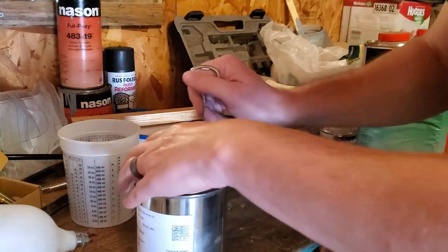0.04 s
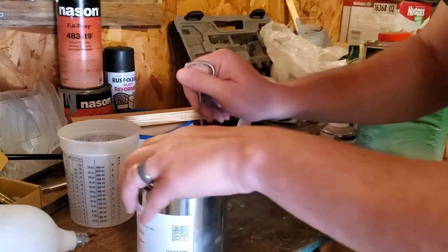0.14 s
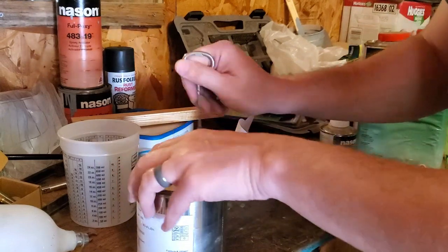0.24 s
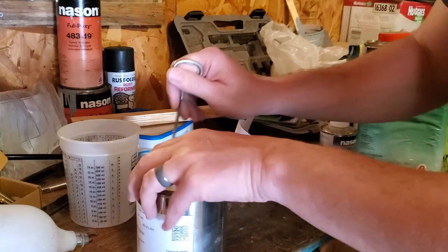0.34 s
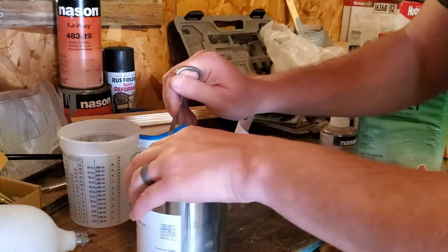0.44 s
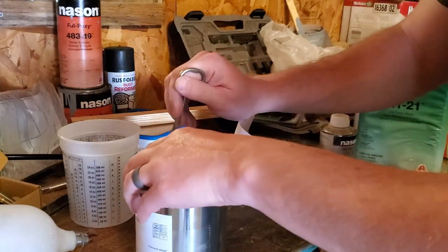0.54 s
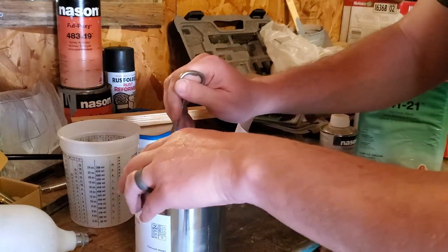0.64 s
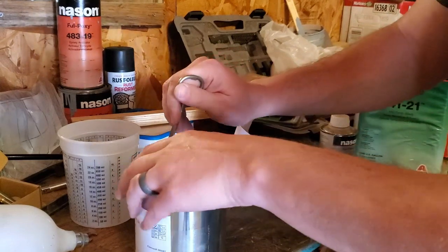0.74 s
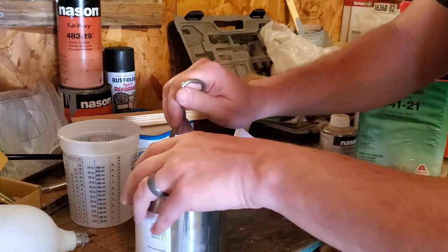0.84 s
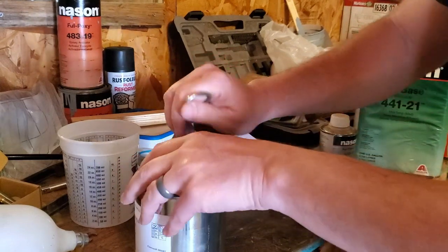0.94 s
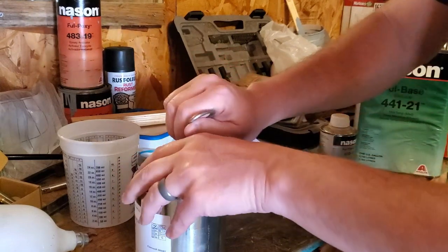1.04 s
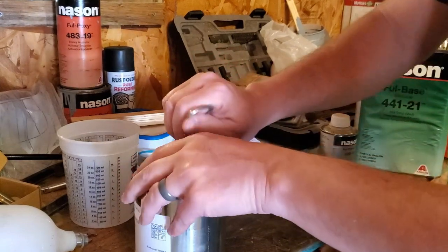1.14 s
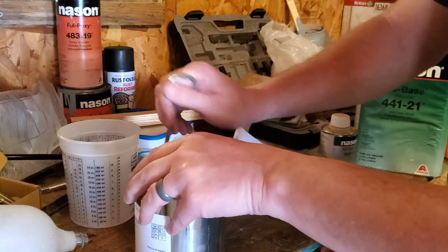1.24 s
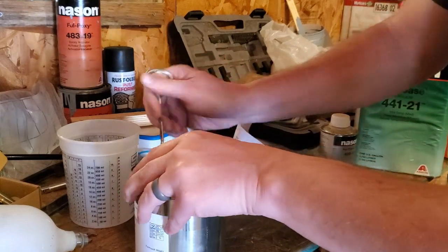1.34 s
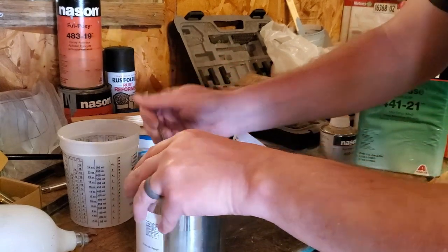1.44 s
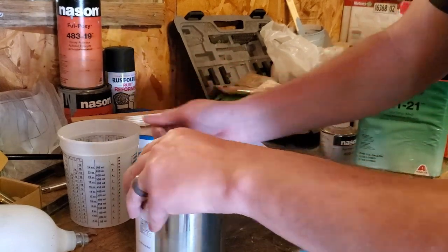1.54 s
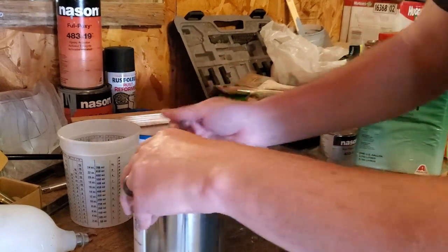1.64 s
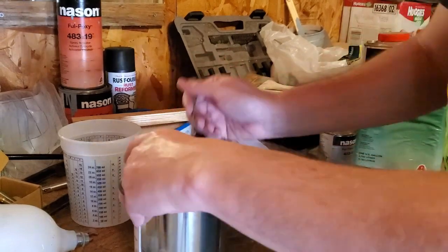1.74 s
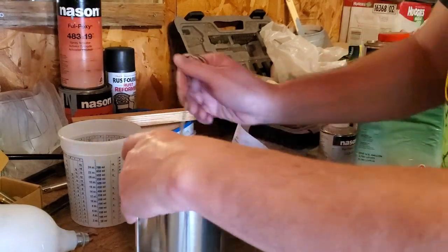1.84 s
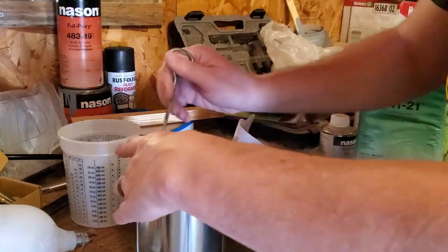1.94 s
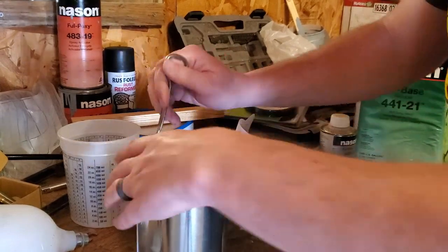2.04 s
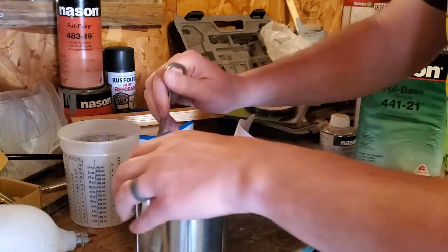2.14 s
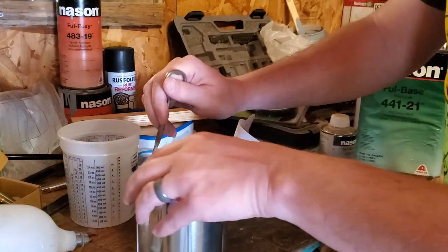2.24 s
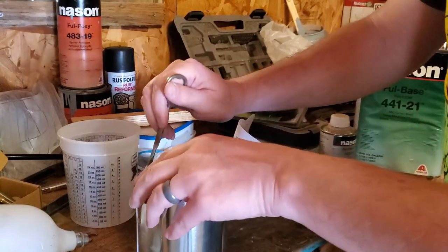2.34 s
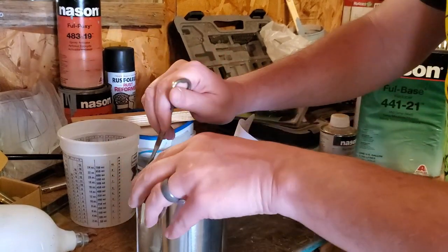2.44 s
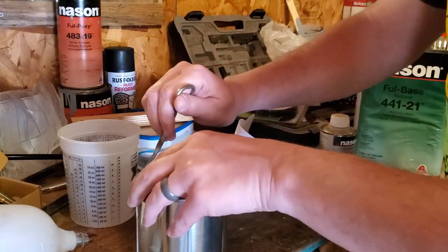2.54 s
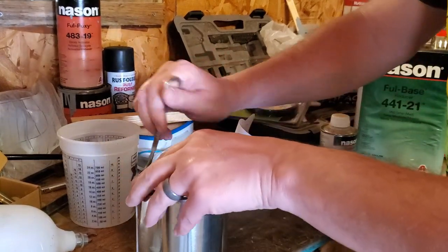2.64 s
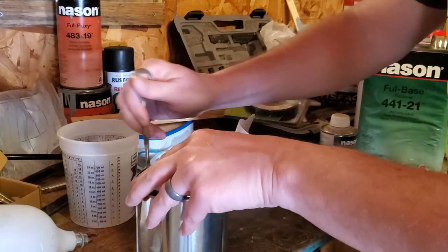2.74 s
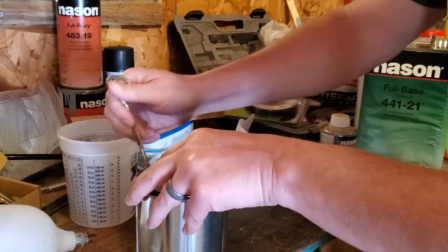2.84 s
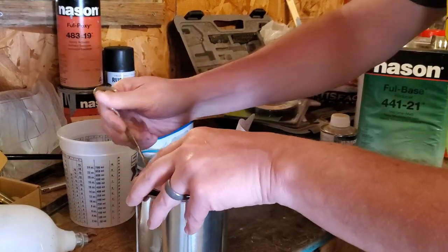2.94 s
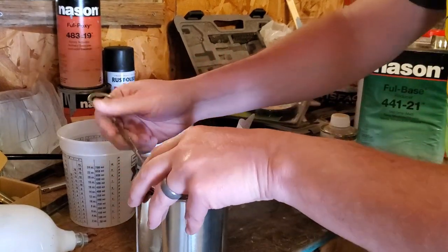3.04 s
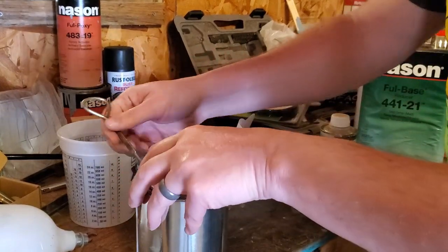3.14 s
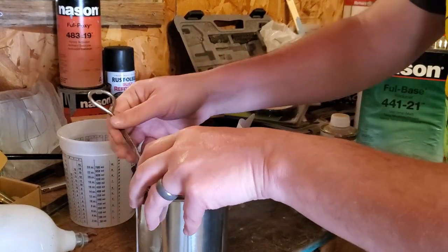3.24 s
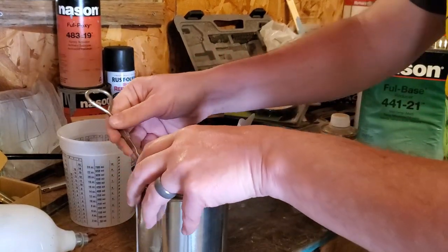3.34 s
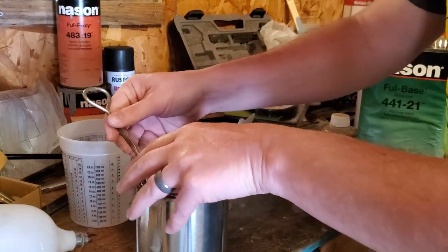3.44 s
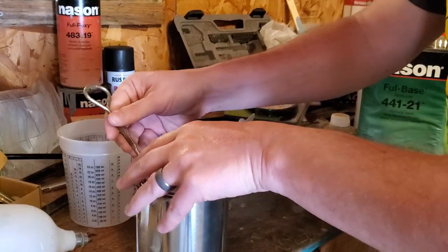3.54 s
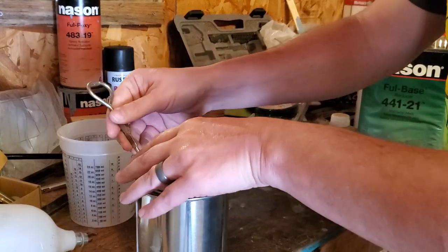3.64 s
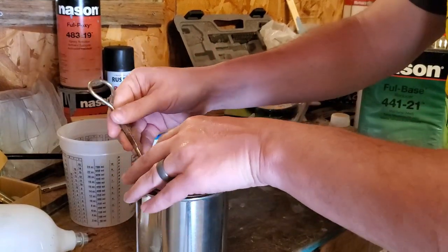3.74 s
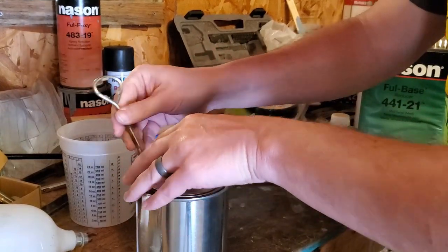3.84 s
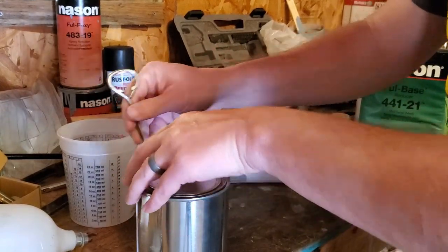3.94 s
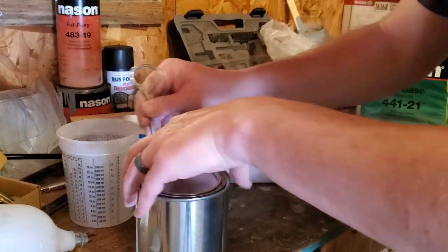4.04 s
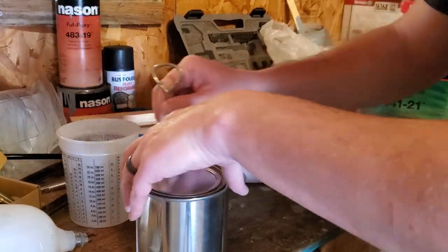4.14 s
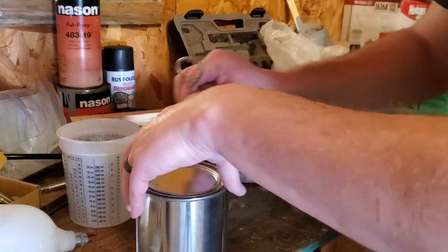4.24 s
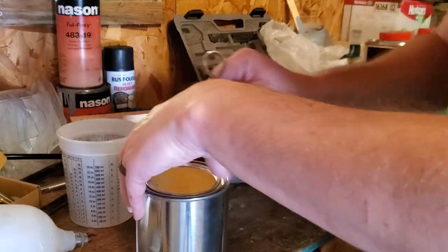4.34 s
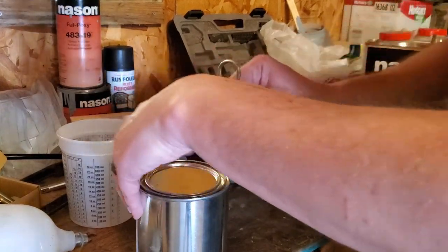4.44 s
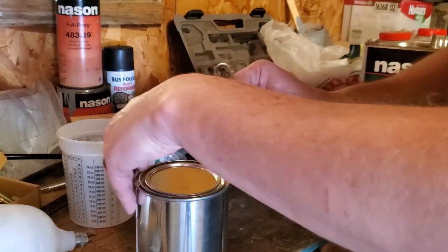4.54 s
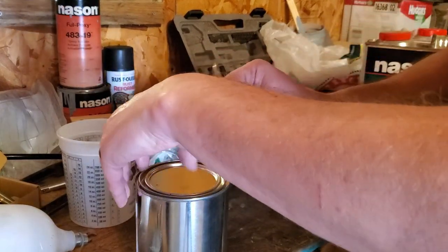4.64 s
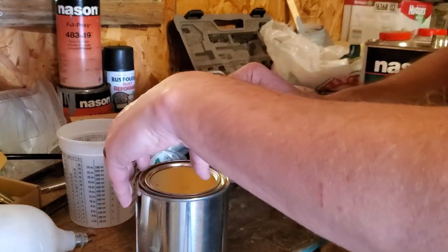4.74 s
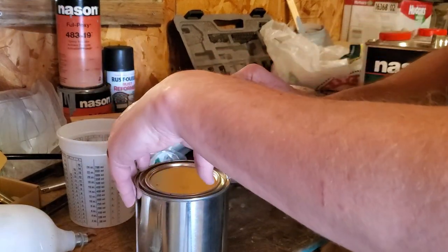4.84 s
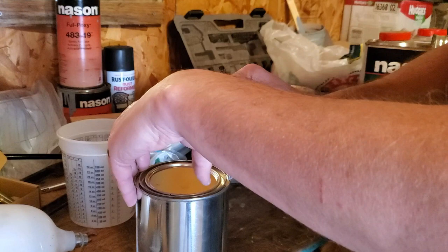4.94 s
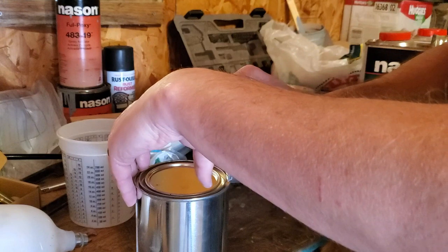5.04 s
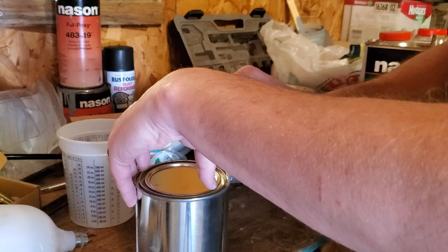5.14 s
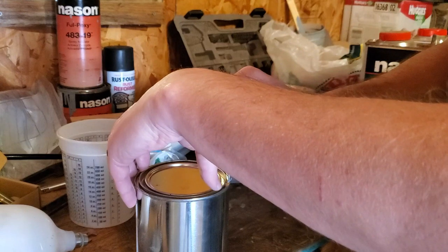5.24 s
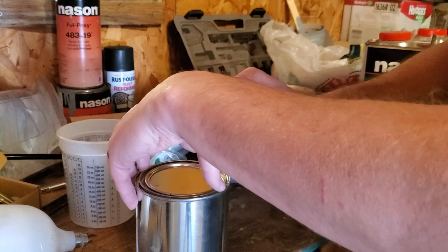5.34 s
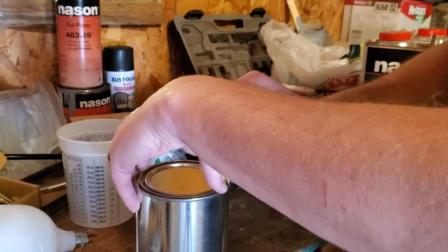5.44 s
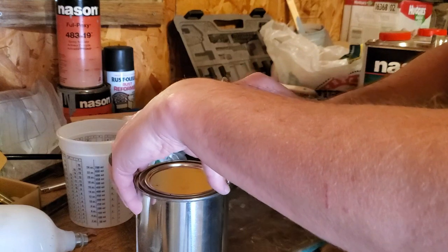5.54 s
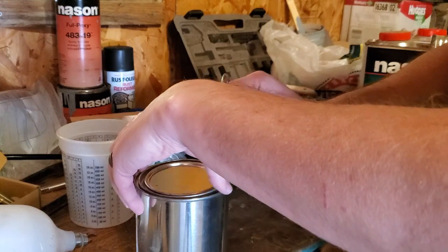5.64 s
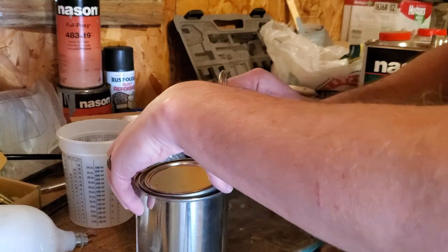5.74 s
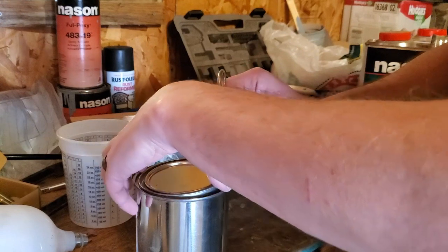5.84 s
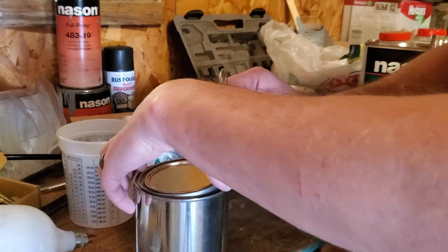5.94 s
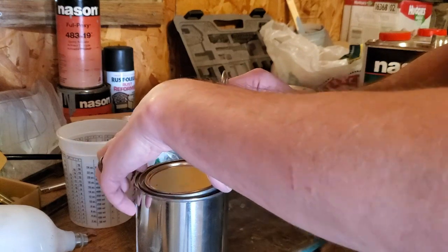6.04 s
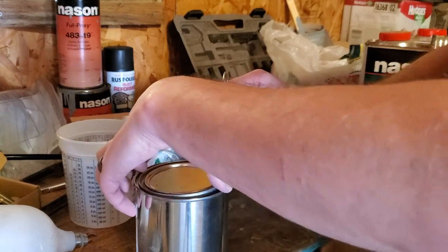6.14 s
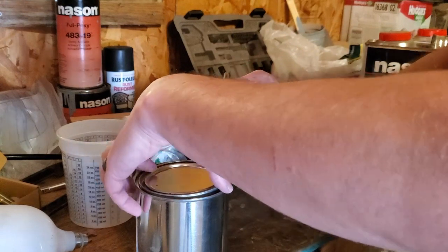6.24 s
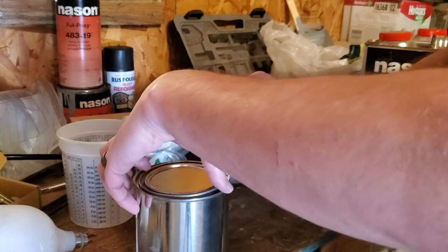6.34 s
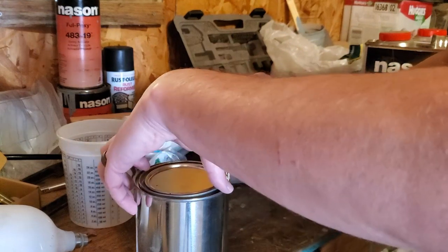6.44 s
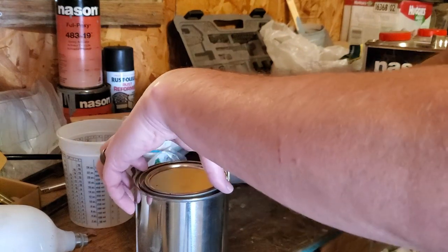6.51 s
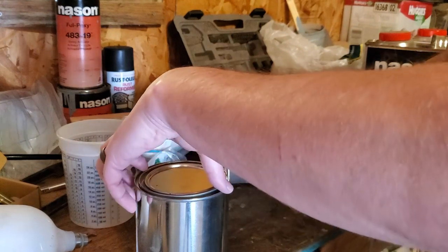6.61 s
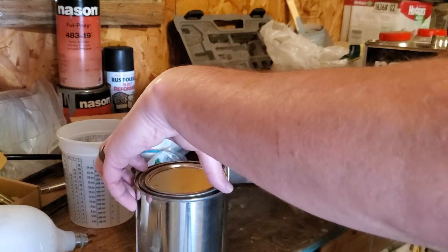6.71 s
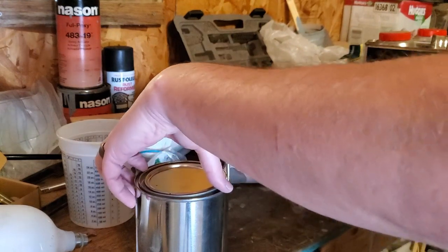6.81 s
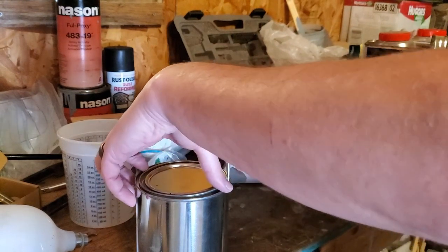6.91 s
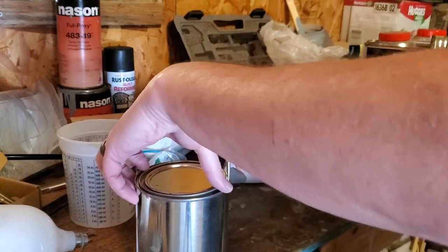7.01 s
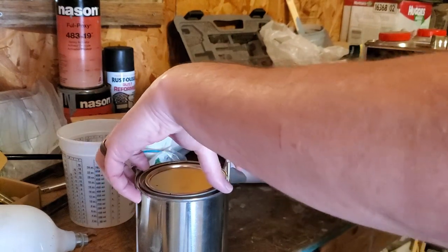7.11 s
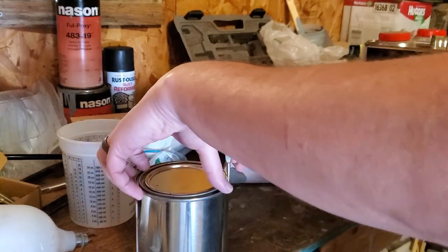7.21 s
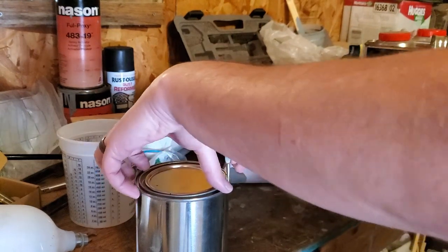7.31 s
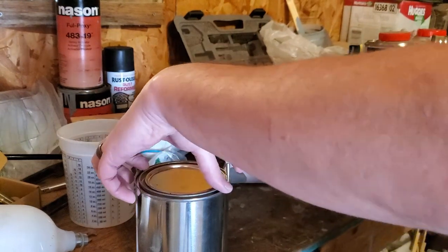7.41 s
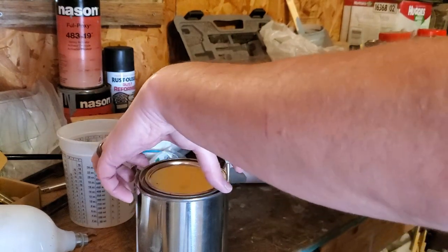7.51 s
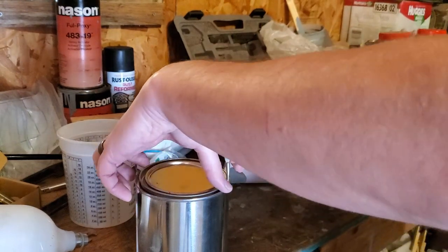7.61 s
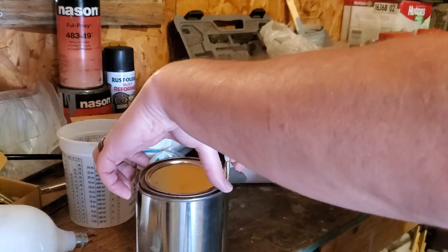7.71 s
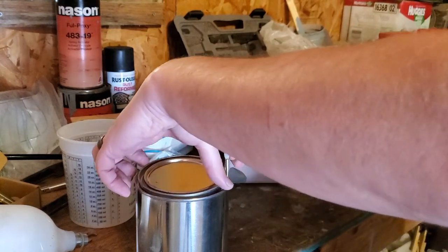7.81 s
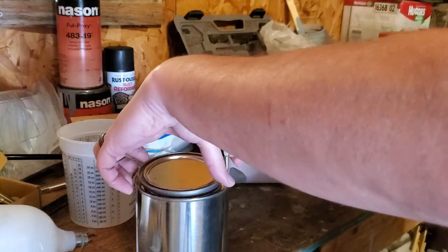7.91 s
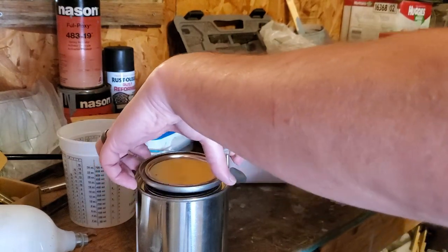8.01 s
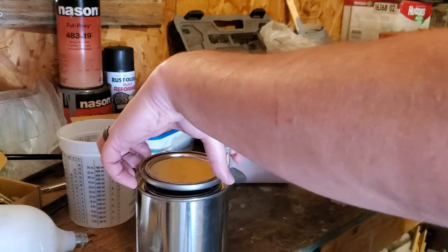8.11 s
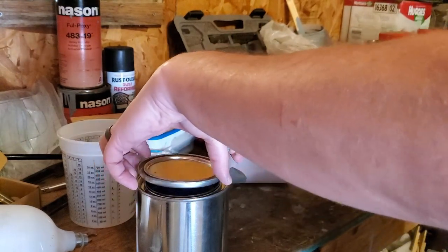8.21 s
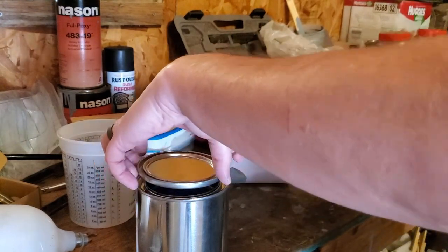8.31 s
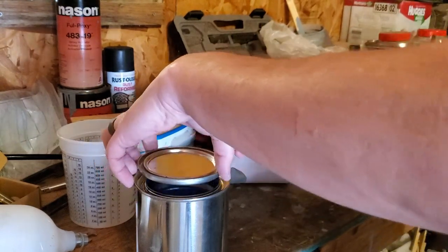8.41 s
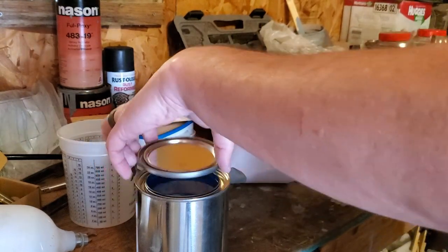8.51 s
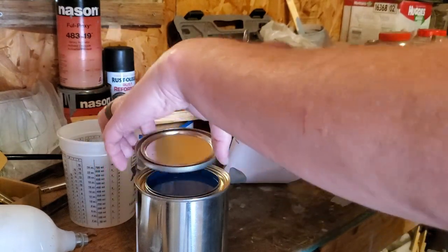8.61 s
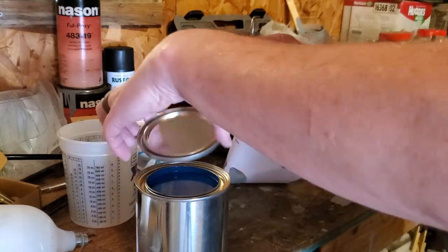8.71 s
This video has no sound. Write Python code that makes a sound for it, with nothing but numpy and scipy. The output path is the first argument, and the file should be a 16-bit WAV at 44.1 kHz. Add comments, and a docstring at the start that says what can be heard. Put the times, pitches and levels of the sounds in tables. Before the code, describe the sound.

A close stereo pickup in a small workshop with short dull echoes and a brief diffuse tail. A steel opener pries round the lid of a full metal can on a wooden bench. Quiet taps open, with firmer knocks at 0.25 and 0.9 s, then the loudest bright double clack at about 1.17 s. Soft scrapes and small hollow clicks run from 1.4 to 2 s, with another hard, crisp clack at 2.7 s. Light ticks follow, a short gritty slip at 3.2 s, then bright tinny scraping bunched around 4.1 to 4.25 s. After a pause, medium knocks come at 5.1, 5.5 and 5.74 s. From 6.2 s there are sparse muted bumps, low rubs and thin rim ticks, fading to tiny slips by 8.6 s. Beneath lie soft bench thuds, wavering low drone, rumble, hiss and very faint hum.

```python
"""In a small workshop, a steel opener works round the lid of a full paint can on a wooden bench.
Tool clicks and can knocks are short bursts of steel chatter beside the ringing modes of can, lid and opener;
scrapes are dense runs of tiny slips into the same can, and slips of the rim give faint high ticks.
Jolts set the bench top swaying. Under it lie a wavering low drone, rumble, microphone hiss and two thin tones
of hum. The chatter of the knocks, the tin noise of the slides and the ticks carry the workshop's echoes and
diffuse tail; in a knock or slide the can's modes ring beside them without the room."""
import sys
import numpy as np
from scipy import signal
from scipy.fft import rfft, irfft, next_fast_len
from scipy.io import wavfile

SR = 44100
rng = np.random.default_rng(int(sys.argv[2]) if len(sys.argv) > 2 else 0)


def dump(signal):
    """Clip the signal to [-1, 1] and save it as 16-bit WAV at the path in sys.argv[1]."""
    limited = np.clip(np.atleast_2d(signal).T, -1, 1)
    pcm = np.round(limited * 32767).astype(np.int16)
    wavfile.write(sys.argv[1], SR, pcm)


N = 386757
SIZE = 32768  # samples in one contact with its decay
TIME, FREQ = np.arange(SIZE) / SR, np.maximum(np.fft.rfftfreq(SIZE, 1 / SR), 1)

# register centres, from bench thud through can body, lid and rim click to top tick: (frequency [Hz])
REGISTER_HZ = [190, 490, 1200, 3900, 11000]
# modes of can, lid and opener: (frequency [Hz], relative level [dB], t60 [s])
CAN_MODES = [(147.3, -3, 0.38), (184.2, -7.5, 0.25), (287.5, -4, 0.23), (397, 3, 0.2), (430.5, 2.5, 0.16),
             (495, 3.5, 0.099), (538.6, -1.5, 0.3), (578.6, -2, 0.2), (646, -5.5, .25), (694, -5, 0.27),
             (844, -3, 0.36), (980, -2, 0.11), (1085, -10, 0.11), (1178, -4.5, 0.2), (1450, -18, 0.087),
             (1572, -0.5, 0.18), (1744, -5.5, 0.24), (2265, -3.5, 0.17), (3040, -9.5, 0.2),
             (3260, -13, 0.21), (3800, -15, 0.22), (3870, -10, 0.15), (4040, -7.5, 0.22),
             (4970, -5.5, 0.14), (6330, 2.5, 0.035), (12360, -3.5, 0.076)]
# colour of the dense, unresolved ringing of the tin: (frequency [Hz], relative level [dB])
TIN_COLOUR = [(50, -8.5), (130, -8), (310, -1), (345, -6.5), (380, 0), (570, -2), (720, -3), (950, -5.5),
              (1550, -5), (1950, -11.5), (3400, -8.5), (3900, -8.5), (7000, -8.5), (16000, -13)]


def from_db(db):
    """Decibels to gain."""
    return 10 ** (np.asarray(db) / 20)


def unit(x):
    """Scale to a mean energy of 1 per channel."""
    return x / np.sqrt(np.mean(np.sum(x ** 2, axis=-1)) + 1e-30)


def at_hz(points, hz):
    """Read a table on a log-frequency axis."""
    f, value = np.transpose(points)
    return np.interp(np.log(hz), np.log(f), value)


def colour(x, db):
    """Causal (minimum-phase) filter with the given gain on FREQ."""
    cepstrum = irfft(np.log(from_db(db)))
    # folding the cepstrum onto positive time makes the phase minimal
    cepstrum[1:SIZE // 2] *= 2
    cepstrum[SIZE // 2 + 1:] = 0
    return irfft(rfft(x, SIZE) * np.exp(rfft(cepstrum)))


def convolve(a, b):
    """Pass a through the response b."""
    return irfft(rfft(a, 2 * SIZE) * rfft(b, 2 * SIZE))[..., :SIZE]


def fade(t60):
    """Free decay by 60 dB in t60 seconds."""
    return np.exp(-np.log(1000) * TIME / max(t60, 1e-3))


def add(out, s, x):
    """Mix a sound in at time s."""
    i = max(round(s * SR), 0)
    out[:, i:i + SIZE] += x[:, :N - i]


def stereo_spread(mid, side, alike):
    """Two equally strong channels whose likeness runs from -1 (opposite) to 1 (the same)."""
    return np.sqrt(1 + alike) * mid + np.sqrt(1 - alike) * side * [[1], [-1]]


def unsteady(points=60):
    """Slow random drift: normal draws joined by straight lines over the whole scene."""
    t = np.arange(N) / SR
    return np.interp(t, np.linspace(0, t[-1], points), rng.standard_normal(points))


def steady_noise(spectrum, low_hz, high_hz):
    """Stereo noise of a given colour between two soft edges; rms 1."""
    # how alike left and right are: (frequency [Hz], likeness [-1 to 1])
    likeness = [(40, 1), (200, 0.66), (600, 0.1), (1500, 0.041), (16000, 0.03)]
    length = next_fast_len(N)
    hz = np.maximum(np.fft.rfftfreq(length, 1 / SR), 1)
    mid, side = rfft(rng.standard_normal((2, length)))
    alike = np.clip(at_hz(likeness, hz), -1, 1)
    edges = np.sqrt((1 + (low_hz / hz) ** 8) * (1 + (hz / high_hz) ** 8))
    gain = from_db(at_hz(spectrum, hz)) / edges
    noise = irfft(gain * stereo_spread(mid, side, alike), length)[:, :N]
    return np.sqrt(N) * unit(noise)


def background(drone_hz, drone_db, wander_hz, flutter_db, rumble_db, rumble_follows):
    """A wavering low drone, rumble that partly follows its level, microphone hiss and steady low room noise."""
    # swell of the drone: (time [s], relative level [dB])
    drone_swell = [(0.0, -48.5), (2.15, -53.5), (2.27, -61), (4.67, -63), (4.69, -70), (5.67, -54.5),
                   (5.76, -71.5), (5.91, -53.5), (6.13, -71.5), (6.32, -59.5), (6.94, -60.5), (7.01, -72),
                   (7.5, -52), (7.84, -70.5), (8.65, -54), (8.77, -72)]
    # colour of the rumble and room noise: (frequency [Hz], relative level [dB])
    rumble_colour = [(15, -34), (25, -8.5), (48, 5), (70, 4.5), (89, -7.5), (118, -16), (162, -16.5),
                     (204, -24.5), (292, -19), (400, -35), (520, -61), (880, -120)]
    # colour of the hiss: (frequency [Hz], relative level [dB])
    hiss_colour = [(200, -3), (350, -0.5), (700, -3.5), (1200, -11), (2500, -14), (5600, -15.5),
                   (6200, -9.5), (6700, -2), (7400, -12.5), (8800, -6.5), (10200, -15.5), (13000, -16),
                   (16000, -19)]
    wander, flutter = unsteady(), unsteady()
    swell_db = np.interp(np.arange(N) / SR, *np.transpose(drone_swell))

    drone = np.sqrt(2) * np.sin(2 * np.pi * np.cumsum(drone_hz + wander_hz * wander) / SR)
    drone = from_db(drone_db + swell_db + flutter_db * flutter) * drone
    rumble_level_db = rumble_db + rumble_follows * (swell_db - swell_db.mean())
    rumble = from_db(rumble_level_db) * steady_noise(rumble_colour, low_hz=43.8, high_hz=127.5)
    hiss = from_db(-75) * steady_noise(hiss_colour, low_hz=197, high_hz=17250)
    room_noise = from_db(-68.5) * steady_noise(rumble_colour, low_hz=107.7, high_hz=297.3)
    return drone + rumble + hiss + room_noise


def hum():
    """Faint distant hum: two thin sines share a slight pitch waver; they sink a little, then grow at the end."""
    # tones: (frequency [Hz], level before the swell [dB])
    hum_tones = [(612, -83), (772, -82.5)]
    # swell: (time [s], level [dB])
    hum_swell = [(0, -9.5), (7.5, -13), (8.1, -8.5), (8.77, -2)]
    waver = 1 + .005 * unsteady()
    tones = 0
    for hz, db in hum_tones:
        tones = tones + from_db(db) * np.sqrt(2) * np.sin(2 * np.pi * hz * np.cumsum(waver) / SR)
    return tones * from_db(np.interp(np.arange(N) / SR, *np.transpose(hum_swell)))


def workshop(tail_db, build_s, echo_cut_hz, lead_s):
    """Stereo response: direct sound, a few dull echoes, and a diffuse tail most alike in both ears in the bass."""
    # echoes off bench clutter, wall and roof: (delay [s], level before dulling [dB])
    echo_list = [(.0052, -8), (0.0098, 3.5), (0.025, -11.5), (0.0424, -1.5)]
    # decay of the diffuse tail: (band centre [Hz], t60 [s])
    tail_decay = [(150, 0.45), (400, 0.43), (1040, 0.36), (2760, 0.29), (7280, 0.27), (14000, .23)]
    # the direct sound reaches the left ear first
    direct = np.exp(2j * np.pi * FREQ * np.array([[0], [-round(lead_s * SR) / SR]]))
    echoes = 0
    for delay, db in echo_list:
        ear_delays = delay + rng.normal(0, 0.00012, (2, 1))
        echoes = echoes + from_db(db) * np.exp(-2j * np.pi * FREQ * ear_delays)
    dull_echoes = echoes / (1 + 1j * FREQ / echo_cut_hz)

    mid, side = rfft(rng.standard_normal((2, SIZE)))
    diffuse = stereo_spread(mid, side, np.clip(.95 * np.sinc(FREQ / 950), -1, 1))
    centres = np.log([hz for hz, t60 in tail_decay])
    tail = 0
    for share, (hz, t60) in zip(np.eye(len(centres)), tail_decay):
        band = np.interp(np.log(FREQ), centres, share)
        tail = tail + irfft(diffuse * band) * fade(t60)
    tail = unit(tail * (1 - np.exp(-TIME / build_s)))
    return irfft(direct + dull_echoes) + from_db(tail_db) * tail


def ringing(modes, spread_db):
    """Each touch wakes the modes with new strengths; the higher ones reach the two ears out of step."""
    out = np.zeros((2, SIZE))
    draws = rng.standard_normal((len(modes), 3))
    for (hz, db, t60), (size, start, skew) in zip(modes, draws):
        wave = np.exp(2j * np.pi * hz * TIME) * fade(t60)
        phase = np.pi * start + np.array([[0], [skew * min(hz / 520, 2)]])
        # dividing by the root of t60 keeps long modes from gaining energy
        gain = from_db(db + spread_db * size) / np.sqrt(max(t60, 1e-3))
        out += gain * (wave * np.exp(1j * phase)).real
    return unit(out * (1 - np.exp(-TIME / 0.00073)))  # soft onset


def contact(strength_db, brightness, hollow_db):
    """Register levels: brightness tilts to the treble, positive hollowness keeps to the lid's middle range."""
    # register levels in an ordinary contact: (relative level [dB])
    ordinary_contact = [-7, -0.73, -0.07, -3, -17]
    lid_hz, hollow_octaves = 1200, 3
    octaves = np.log2(np.array(REGISTER_HZ) / lid_hz)
    hollow = hollow_db * (octaves / hollow_octaves) ** 2
    return strength_db + np.array(ordinary_contact) + brightness * octaves - hollow


def voiced(x, levels_db):
    """Place and hardness of a contact set how much goes into each register (rms over 50 ms)."""
    # treble response of the microphone: (frequency [Hz], gain [dB])
    microphone = [(6400, -2), (7200, -7.5), (7600, -17), (8200, -19.5), (8900, -15), (11200, -12),
                  (12600, -10.5), (13400, -8), (15000, -13), (15700, -11.5)]
    # borders of the registers: (frequency [Hz])
    border_hz = [110, 340, 700, 2000, 7500, 16000]
    x = colour(x, at_hz(microphone, FREQ))
    gain_db = np.zeros(len(REGISTER_HZ))
    power = np.mean(abs(rfft(x)) ** 2, axis=0) * 2 / SIZE / (.05 * SR)
    borders = np.searchsorted(FREQ, border_hz)

    def tilt():
        return np.interp(np.log(FREQ), np.log(REGISTER_HZ), gain_db)

    for _ in REGISTER_HZ:  # neighbouring registers overlap, so the gains settle in a few steps
        register_power = np.add.reduceat(power * from_db(2 * tilt()), borders)[:-1]
        gain_db += levels_db - 10 * np.log10(register_power)
        gain_db = np.maximum(gain_db, gain_db.max() - 36)
    return colour(x, tilt())


def spot(ring_hz, ring_db, t60):
    """Gain in dB on FREQ: the touched spot lifts one narrow resonance out of the dense ringing."""
    width_hz = np.log(1000) / (np.pi * max(t60, 1e-3))
    return 10 * np.log10(1 + from_db(2 * ring_db) / (1 + (2 * (FREQ - ring_hz) / width_hz) ** 2))


def to_ears(x):
    """Each frequency range leans a little to one side."""
    # lean of the stereo image: (frequency [Hz], left over right [dB])
    lean = [(60, -2), (150, 1), (380, -0.5), (950, 1.5), (2380, 1.5), (5980, -1), (15000, 2.5)]
    return irfft(rfft(x) * from_db(at_hz(lean, FREQ) * np.array([[.5], [-.5]])))


def knocks(room, chatter_t60, chatter_db, modes_db, spot_t60, spot_db, level_db):
    """A sharp contact and a few ms of steel chattering on tin set the can and the touched spot ringing."""
    # knocks of tool, lid and can: (time [s], strength before level_db [dB], brightness [dB per octave],
    # hollowness [dB], ring of the touched spot [Hz], ring level before spot_db [dB])
    knock_list = [(.011,-53.5,-1.5,-7.5,425,-35), (.079,-58.5,-3.5,-11,510,-9),
                  (.252,-46.5,-.5,-2.5,224,-0.5), (.873,-46,0.2,5,1450,2), (.9,-47,0,-1,500,-6.5),
                  (1.099,-93,-1,-8,1460,24.5), (1.161,-33.5,1.27,-3,1150,-11),
                  (1.171,-38.5,-4,5.5,560,-3.5), (1.323,-56.5,-0.2,16,1450,-10), (1.43,-52.5,0,2,537,-5),
                  (1.468,-64,-2,-8,515,-11), (1.584,-61,1.4,-6,5870,-14), (1.633,-50.5,1,15,1000,-9.5),
                  (1.732,-51,0.5,14,970,-16), (1.812,-48.5,0.5,26,1574,-4.5), (1.826,-44.5,0.9,1,4040,-3),
                  (2.011,-57,-2,-3.5,1620,-6.5), (2.403,-58,3,12,2100,7), (2.44,-53.5,-1.45,-0.5,407,-7.5),
                  (2.692,-35.5,1.93,2.5,1027,-5), (2.702,-38.5,-0.5,2.5,387,-6),
                  (2.935,-62.5,-1.5,11,2500,-3), (3.155,-53,6.5,8,1570,-1), (3.183,-64,1.5,-11,902,14),
                  (3.424,-65,0.5,-9.5,610,-8.5), (3.892,-69.5,3.5,0,1600,3), (3.971,-53.5,0,-2,1040,-9.5),
                  (4.093,-51.5,-0.4,-0.5,530,-4), (4.271,-50,-1.9,4.5,405,-26),
                  (5.113,-48.5,1.5,12,452,-1.5), (5.163,-55,-2.5,7.5,574,-10.5),
                  (5.499,-46,2.5,-3.5,2290,-7.5), (5.528,-43.5,-1.8,9,500,-5.5),
                  (5.739,-52,1.45,-2,3940,-5), (6.241,-71,-1.5,-1,850,5), (6.299,-54.5,-1.5,-10,1520,1.5),
                  (6.589,-78,2,0,438,4), (6.664,-54.5,-2,2,507,-5.5), (7.068,-76,-9.5,18,450,-4),
                  (7.093,-62.5,-6.5,18,427,-10.5), (7.349,-77,-8,4,397,-12), (7.402,-63.5,-10,22,400,-21),
                  (7.618,-66.5,-2.3,-13.5,837,-3.5), (8.269,-81,8,2,1560,4.5)]
    out = np.zeros((2, N))
    for s, strength_db, brightness, hollow_db, ring_hz, ring_db in knock_list:
        chatter = unit(rng.standard_normal(SIZE) * fade(chatter_t60))
        strike = (TIME == 0) + from_db(chatter_db) * chatter
        tin = colour(strike, at_hz(TIN_COLOUR, FREQ))
        sound = unit(convolve(tin, room())) + from_db(modes_db) * ringing(CAN_MODES, spread_db=1.5)
        sound = voiced(sound, contact(strength_db + level_db, brightness, hollow_db))
        sound = colour(sound, spot(ring_hz, ring_db + spot_db, spot_t60))
        add(out, s, to_ears(sound))
    return out


def bench():
    """The can or a leaning arm jolts the bench, and its top sways in its lowest modes."""
    # jolts: (time [s], level [dB])
    jolts = [(.255, -38), (1.44, -43), (2.72, -39), (5.53, -48.5), (6.295, -46.5), (8.42, -52),
             (8.609, -52.5)]
    # modes of the bench top: (frequency [Hz], relative level [dB], t60 [s])
    bench_modes = [(66.55, 1.5, 0.47), (88.4, -7.5, 0.31), (148.8, -9, .3)]
    rise_s = 0.008
    out = np.zeros((2, N))
    sway = sum(from_db(db) * np.sin(2 * np.pi * hz * TIME) * fade(t60) for hz, db, t60 in bench_modes)
    sway = sway * (1 - np.exp(-TIME / rise_s))
    for s, db in jolts:
        add(out, s, from_db(db) * sway[None])
    return out


def slides(room, slips_per_s, uneven_db, modes_db, spot_t60, spot_db, level_db):
    """Sliding is a dense run of tiny slips into the same can, swelling and dying with the stroke."""
    # slides of hand, tool and can: (peak time [s], rise [s], fall [s], strength before level_db [dB],
    # brightness [dB per octave], hollowness [dB], ring of the spot [Hz], ring level before spot_db [dB])
    slide_list = [(0.583, 0.098, 0.13, -63, -0.5, -6.5, 1440, -6),
                  (1.47, 0.14, 0.16, -61.5, -3, -11, 473.0, -22),
                  (1.66, 0.12, 0.23, -53.0, -0.3, -0.5, 1510.0, -28),
                  (1.99, 0.12, 0.098, -58.5, -2, -5.5, 1590.0, -16),
                  (3.177, 0.026, 0.0029, -49.0, 3, 8, 2450, 1.5),
                  (3.94, 0.066, 0.045, -71, 2.3, -5.0, 1535, 3),
                  (4.078, 0.048, 0.015, -41, 3.9, 5, 2354, 0.5),
                  (4.162, 0.03, 0.038, -49.5, 1.8, 5.5, 821, 2),
                  (4.211, 0.025, 0.028, -52, 11, 16, 1635, 1.5),
                  (4.248, 0.045, 0.012, -49, 10, 6.5, 4080, -2),
                  (5.355, 0.044, 0.052, -63.5, -4.9, 14.5, 656, -1),
                  (5.475, 0.05, 0.051, -66, -4, -2, 594.0, -6), (5.647, 0.07, 0.2, -82, -3.5, -13, 1030, 9),
                  (6.596, 0.073, 0.082, -68, -4.3, 5, 458, -2.5),
                  (7.09, 0.075, 0.079, -65, -7, 15.5, 440, -12),
                  (7.405, 0.08, 0.15, -68, -8.5, 9, 373, -16),
                  (7.906, 0.072, 0.13, -78, -2.8, -3.5, 592.0, -3),
                  (8.3, 0.038, 0.16, -83.5, 3, -3, 1600, 3),
                  (8.58, 0.093, 0.091, -92.5, 1, -20.5, 1590, 11.0)]
    out = np.zeros((2, N))
    for peak, rise, fall, strength_db, brightness, hollow_db, ring_hz, ring_db in slide_list:
        pressure = np.interp(TIME, [0, rise, rise + fall], [0, 1, 0])
        slips = (rng.random(SIZE) < slips_per_s / SR) * rng.choice([-1, 1], SIZE)
        slips = slips * from_db(uneven_db * rng.standard_normal(SIZE))
        can = unit(colour(room(), at_hz(TIN_COLOUR, FREQ)))
        can = can + from_db(modes_db) * ringing(CAN_MODES, spread_db=4.0)
        sound = convolve(slips * pressure, can)
        sound = voiced(sound, contact(strength_db + level_db, brightness, hollow_db))
        sound = colour(sound, spot(ring_hz, ring_db + spot_db, spot_t60))
        add(out, peak - rise, to_ears(sound))
    return out


def rim_ticks(room):
    """The rim of the lid slips in its groove with a thin tick that rings only its own high modes."""
    # ticks: (time [s], level as rms over 50 ms [dB])
    tick_list = [(3.423, -63), (6.238, -69), (6.297, -57.5), (6.664, -64), (7.618, -72.5), (8.27, -69),
                 (8.385, -77.5), (8.585, -73)]
    # modes of the rim: (frequency [Hz], relative level [dB], t60 [s])
    rim_modes = [(4090, -11.5, 0.072), (5020, -1.5, 0.043), (5380, -1, 0.033), (5770, -4, 0.02),
                 (6450, 2, 0.02), (6890, -3, .05)]
    out = np.zeros((2, N))
    for s, db in tick_list:
        tick = unit(convolve(ringing(rim_modes, spread_db=2), room()))
        add(out, s, from_db(db) * np.sqrt(.05 * SR) * tick)
    return out


def scene():
    """Knocks, slides and ticks over the background and hum, with the bench swaying under them."""
    def room():
        """Each touch gets a newly drawn room response with the same decay and nearly the same echoes."""
        return workshop(tail_db=5.5, build_s=0.00054, echo_cut_hz=540, lead_s=.00011)

    floor = background(drone_hz=43.8, drone_db=-0.5, wander_hz=1.2, flutter_db=2.5,
                       rumble_db=-59.5, rumble_follows=.35)
    hits = knocks(room, chatter_t60=0.026, chatter_db=2.5, modes_db=-6.0,
                  spot_t60=0.021, spot_db=16.0, level_db=-2.52)
    rubs = slides(room, slips_per_s=1500, uneven_db=6.0, modes_db=-6.5,
                  spot_t60=0.049, spot_db=14.5, level_db=0.4)
    return floor + hum() + hits + bench() + rubs + rim_ticks(room)


def record(dry):
    """A steep elliptic low-pass cuts the top."""
    cutoff_hz = 15800
    low_pass = signal.ellip(10, .2, 80, cutoff_hz, fs=SR, output="sos")
    return signal.sosfilt(low_pass, dry)


dry = scene()
out = record(dry)
dump(out)
```